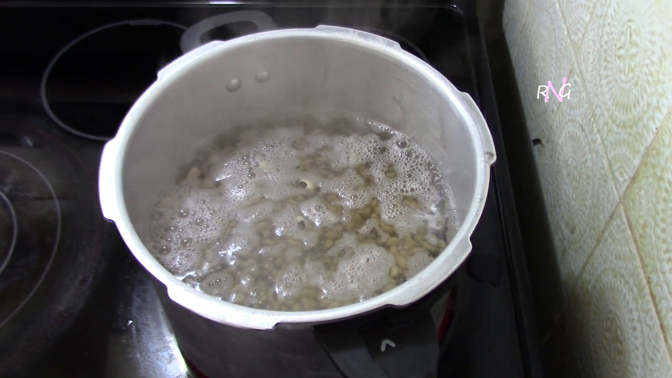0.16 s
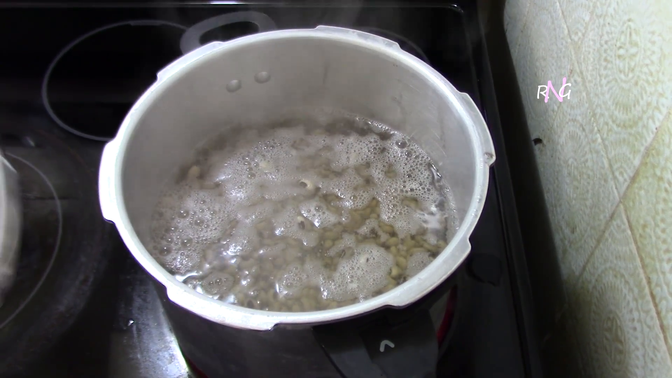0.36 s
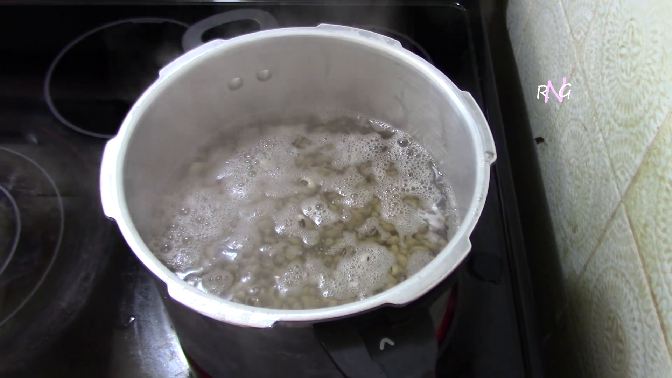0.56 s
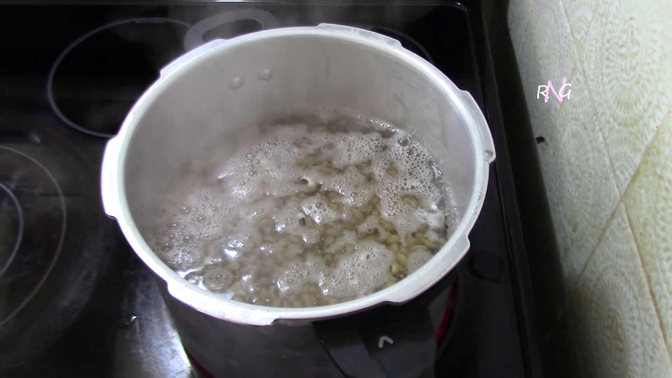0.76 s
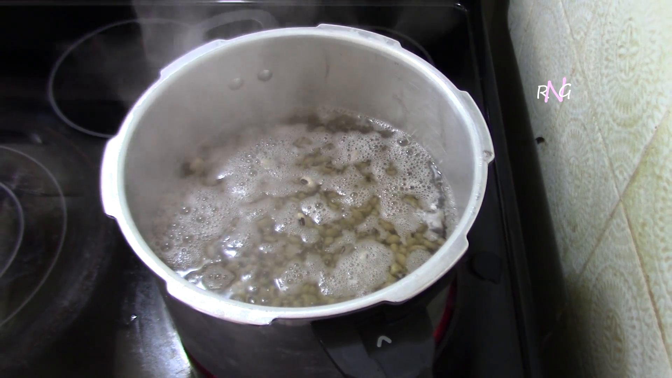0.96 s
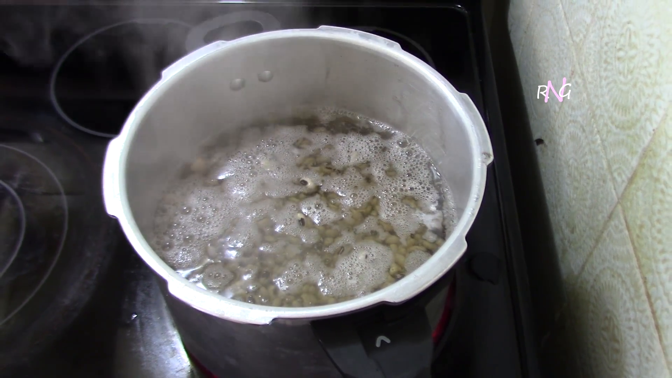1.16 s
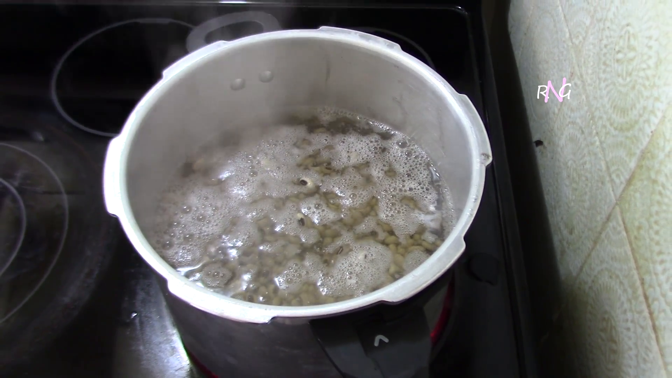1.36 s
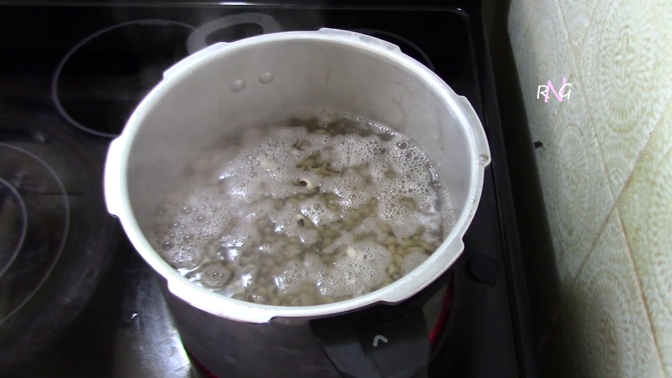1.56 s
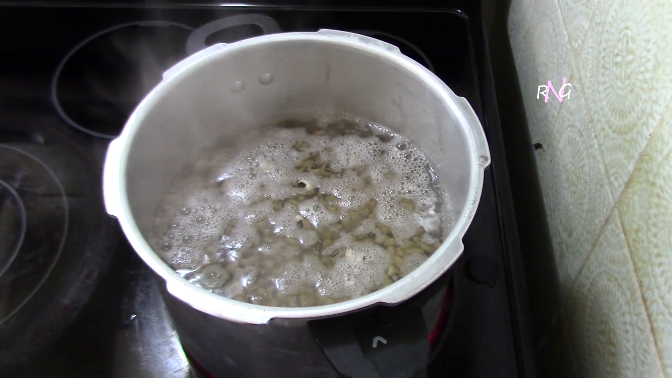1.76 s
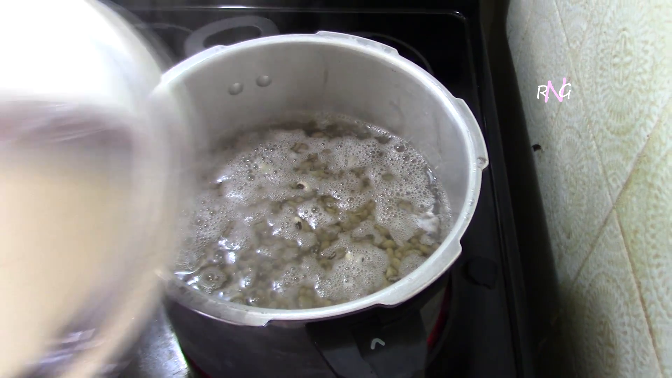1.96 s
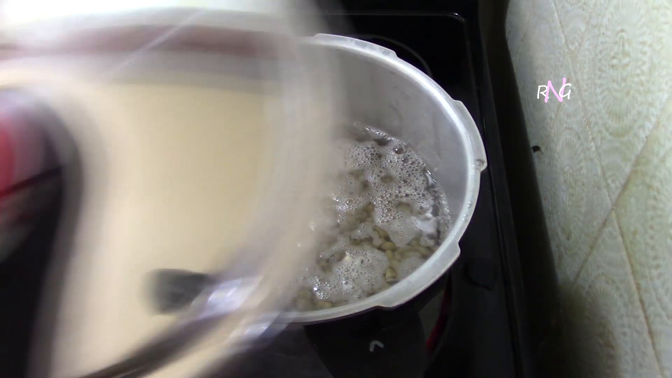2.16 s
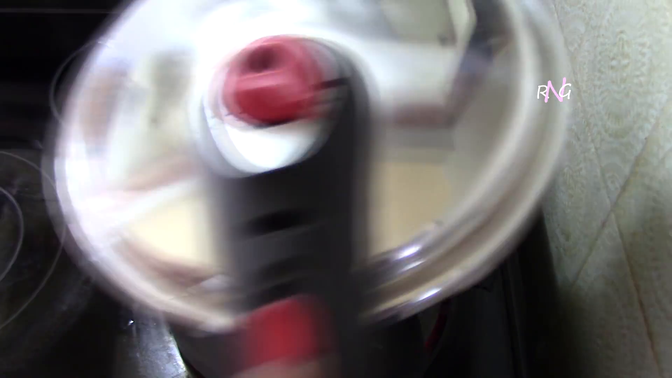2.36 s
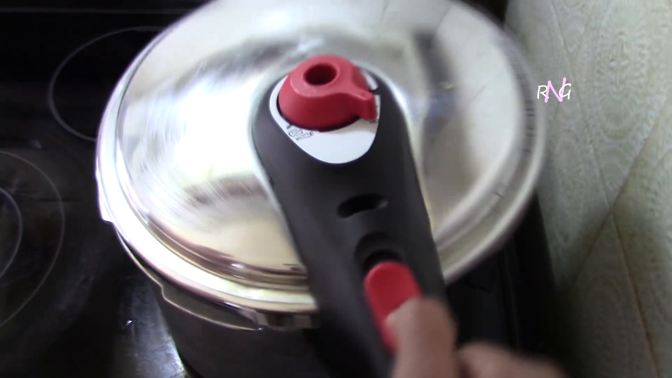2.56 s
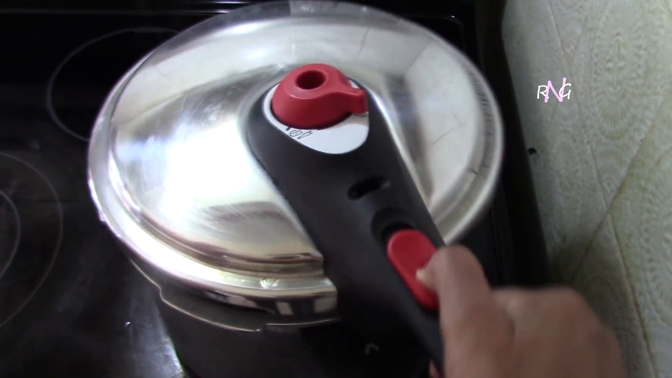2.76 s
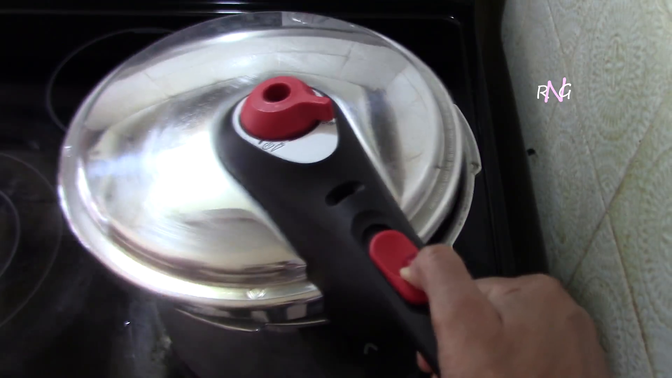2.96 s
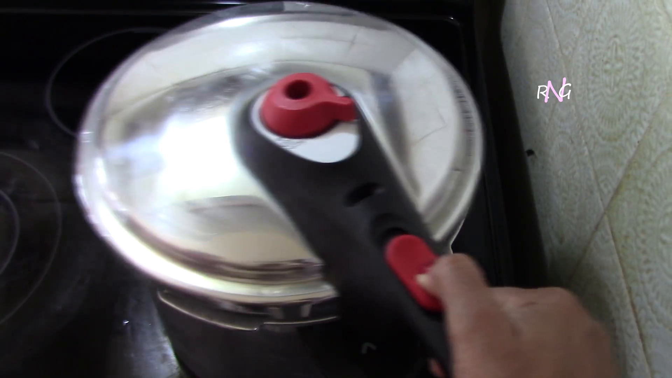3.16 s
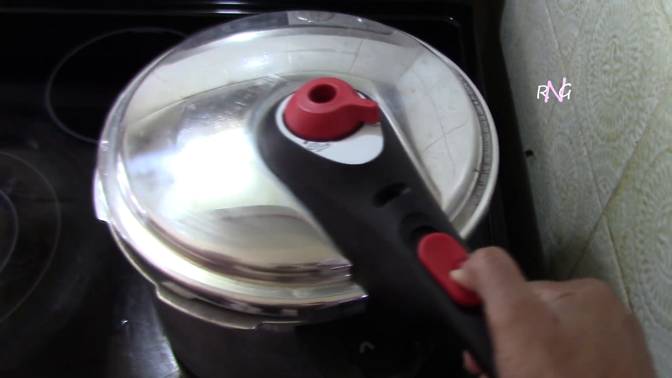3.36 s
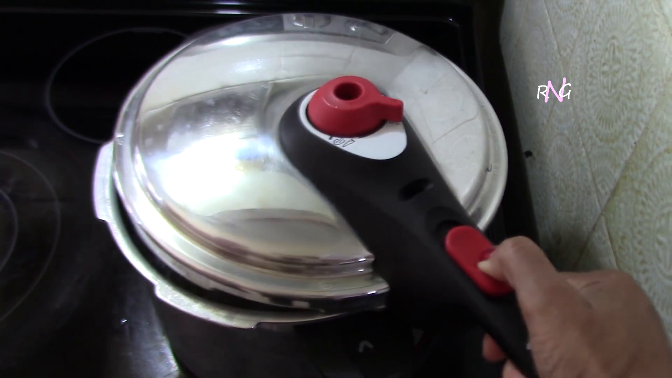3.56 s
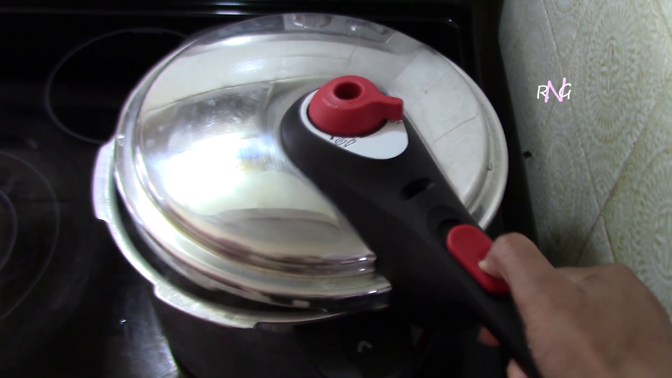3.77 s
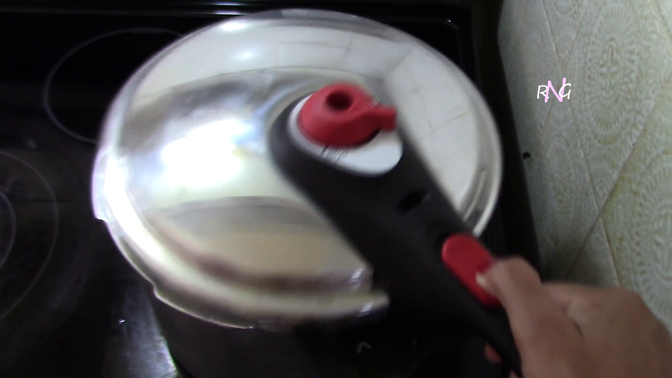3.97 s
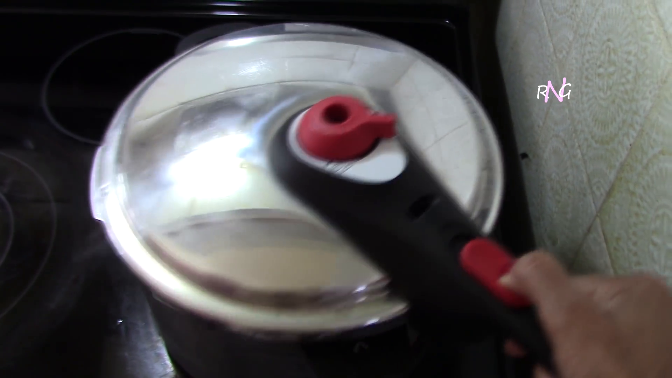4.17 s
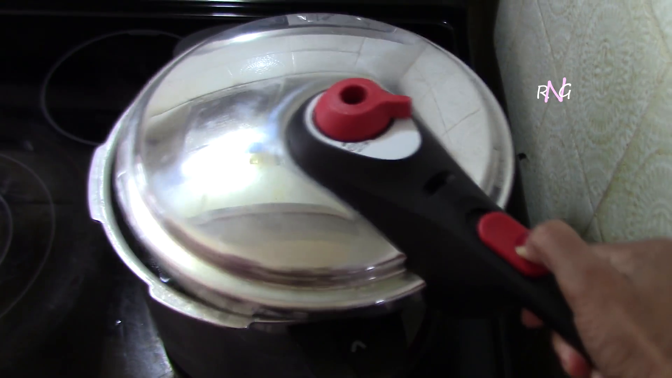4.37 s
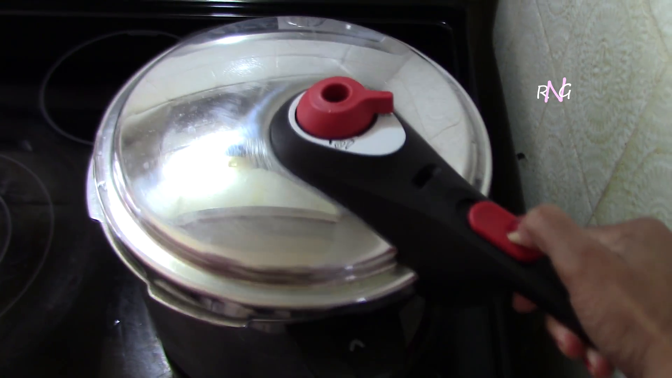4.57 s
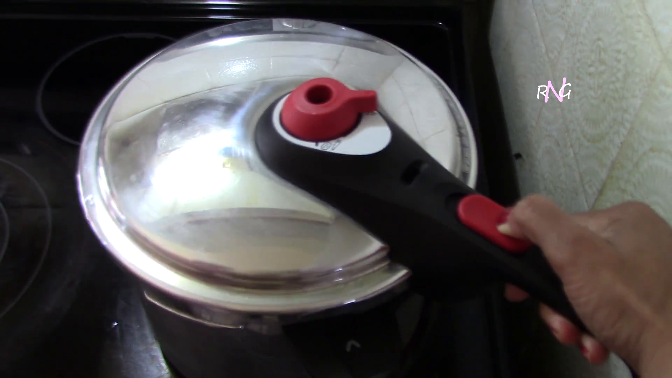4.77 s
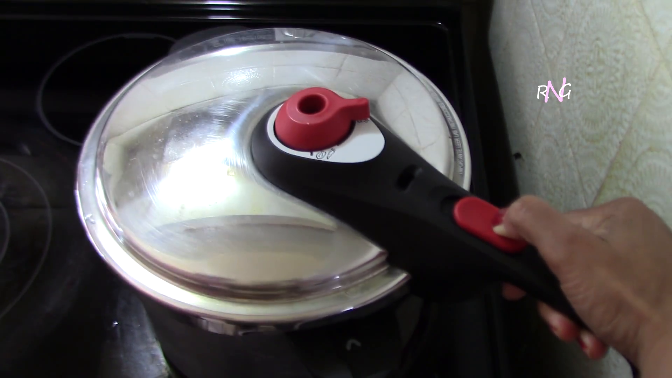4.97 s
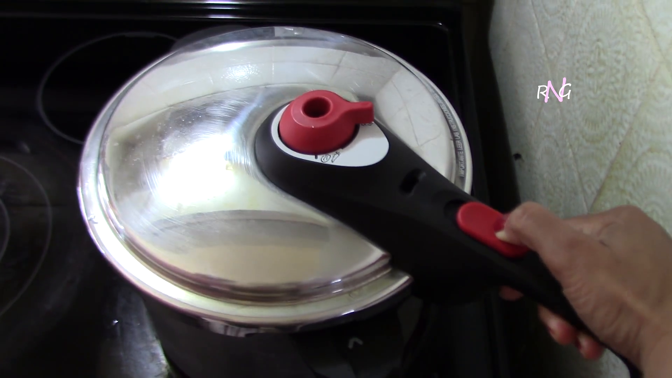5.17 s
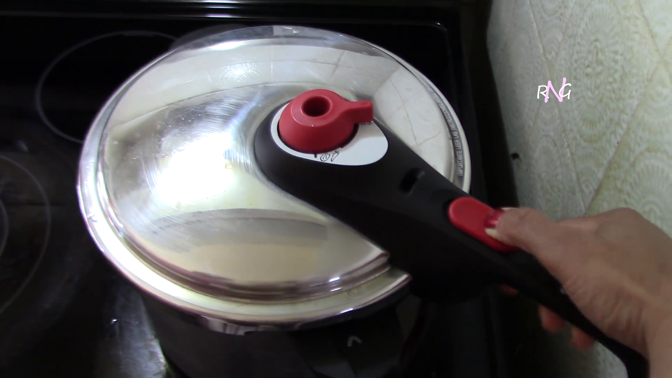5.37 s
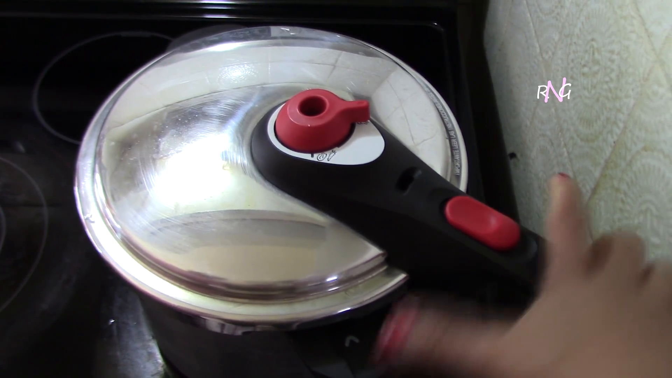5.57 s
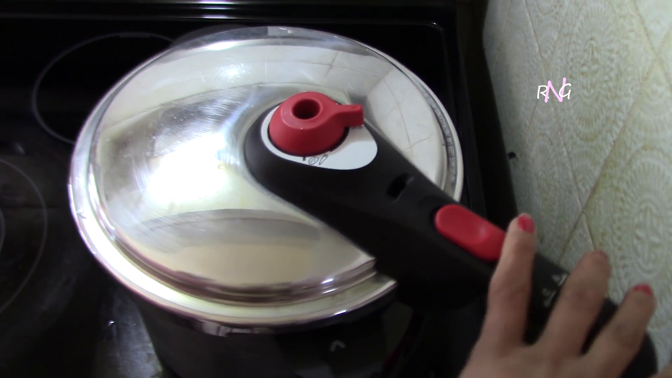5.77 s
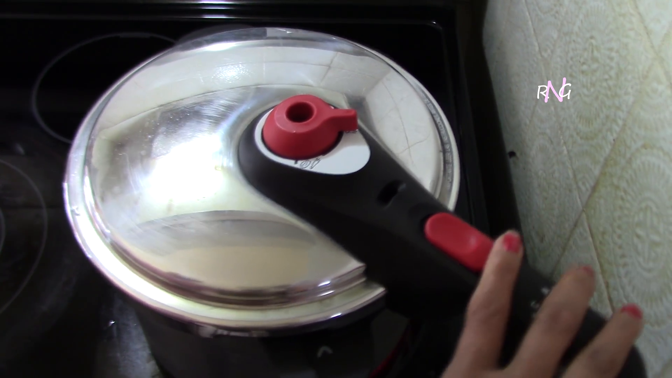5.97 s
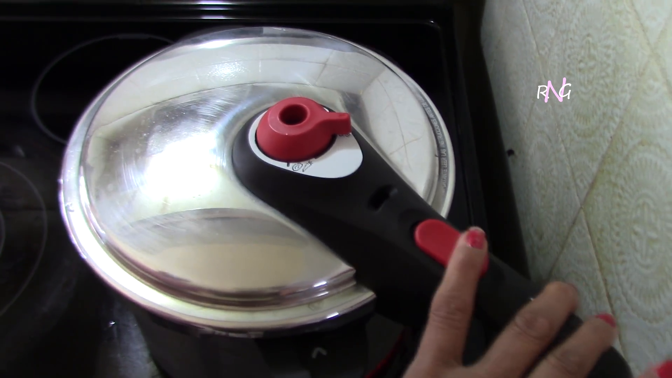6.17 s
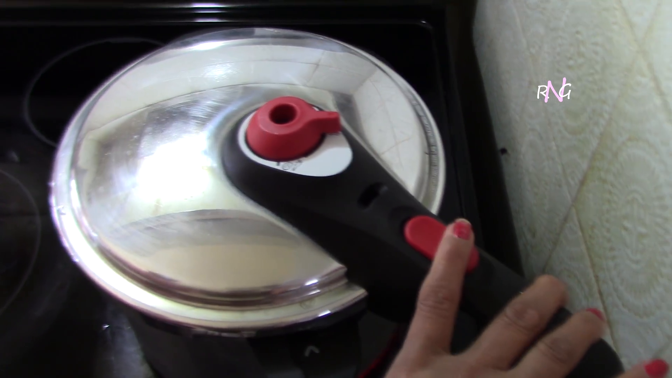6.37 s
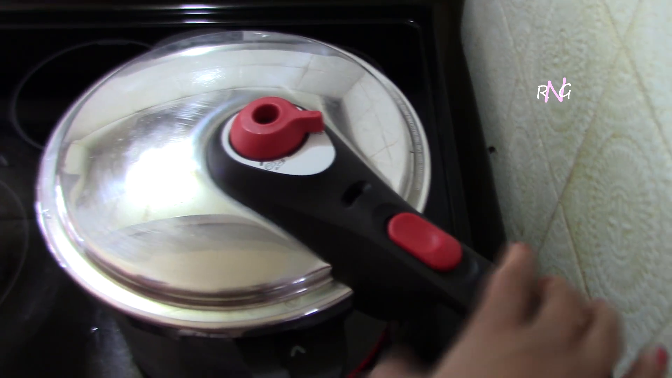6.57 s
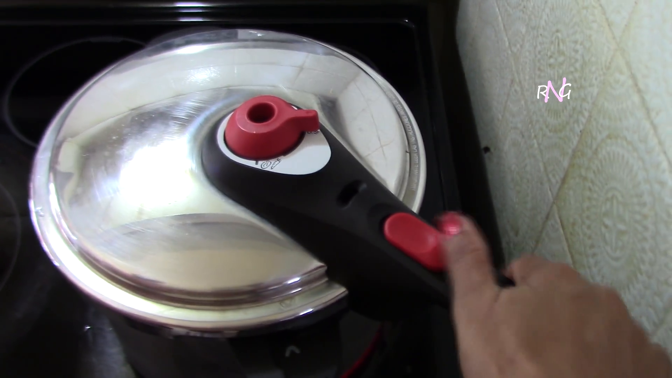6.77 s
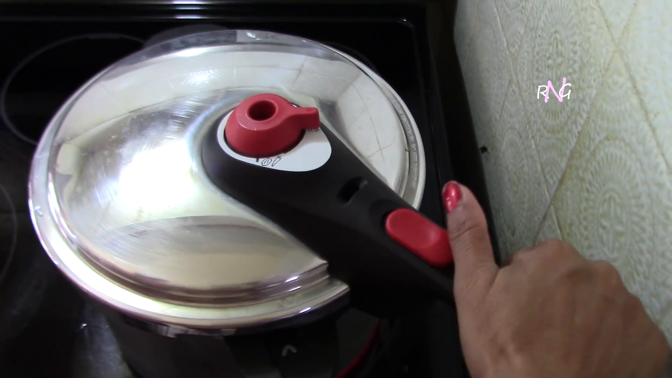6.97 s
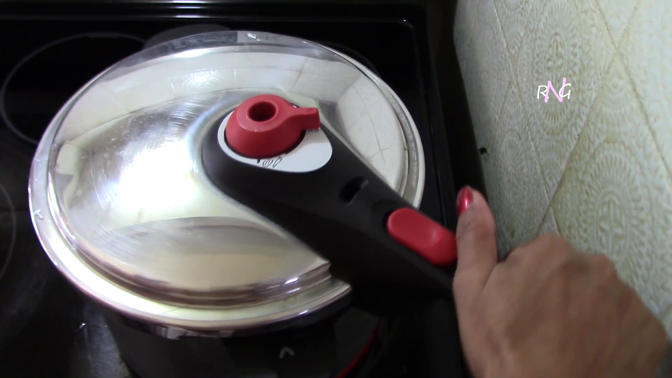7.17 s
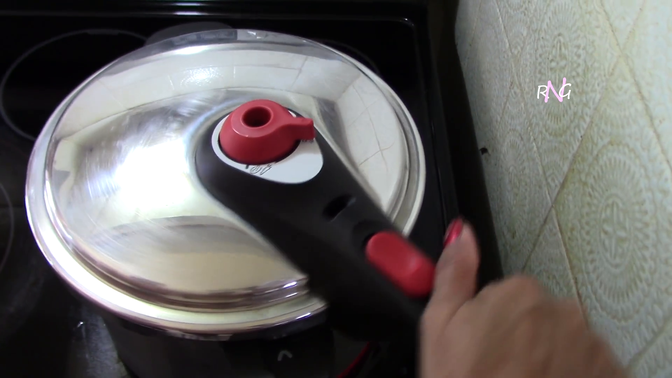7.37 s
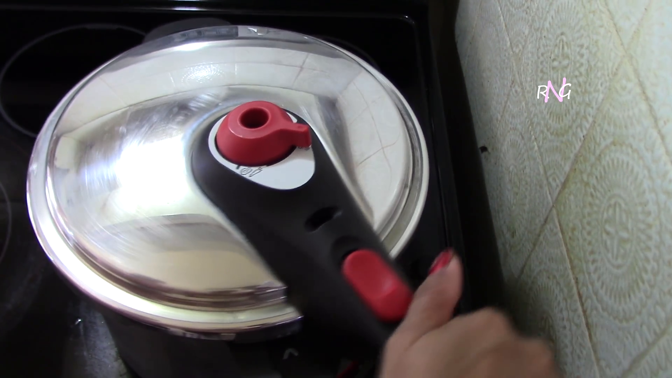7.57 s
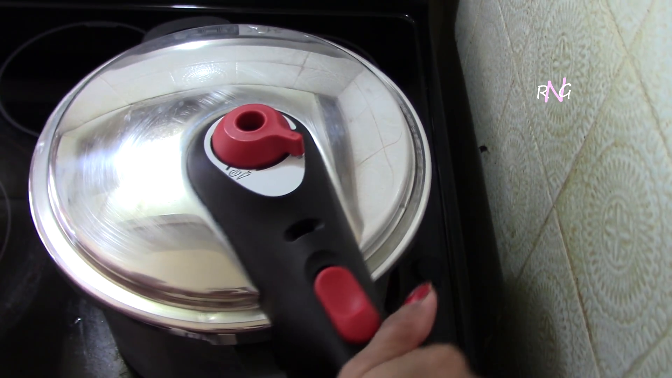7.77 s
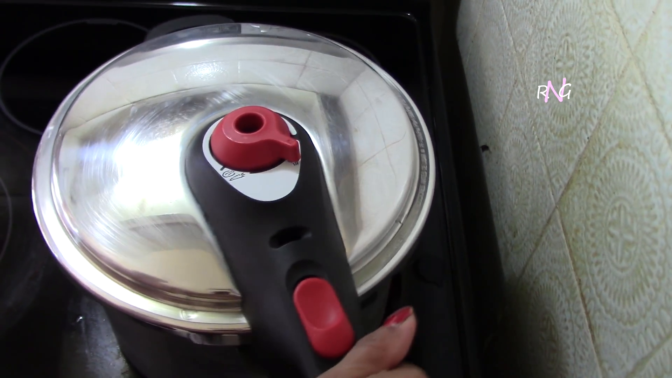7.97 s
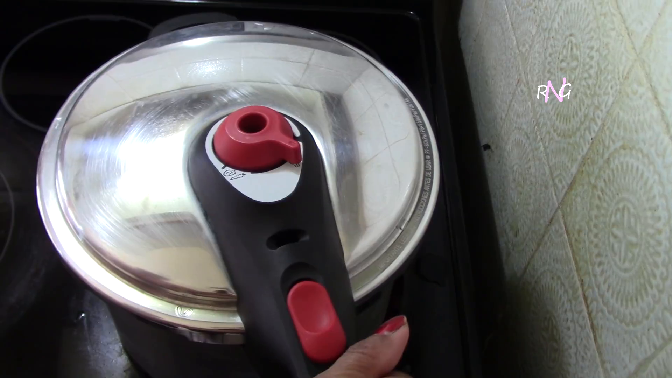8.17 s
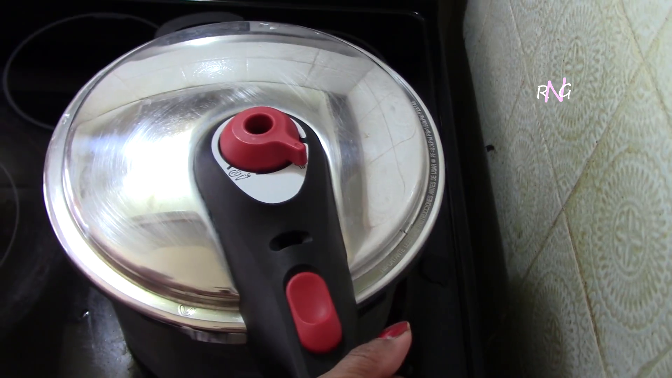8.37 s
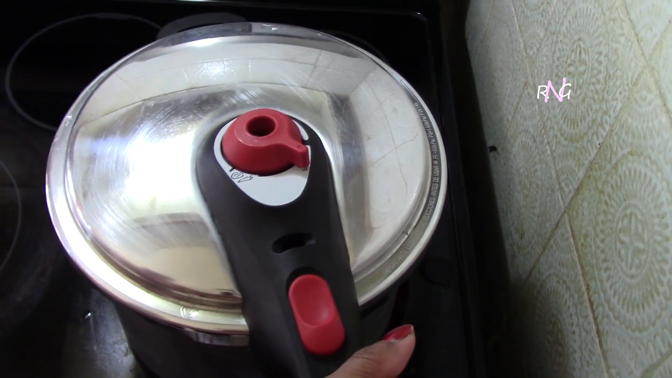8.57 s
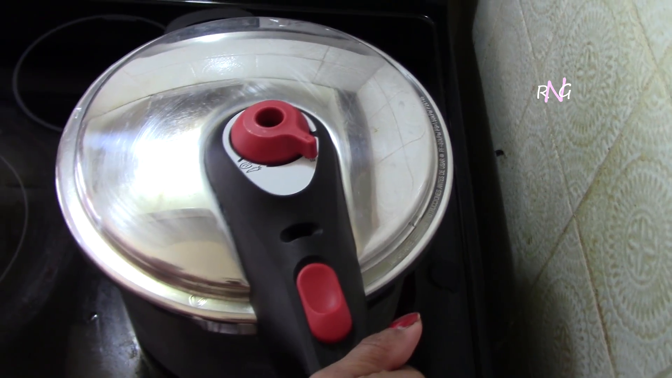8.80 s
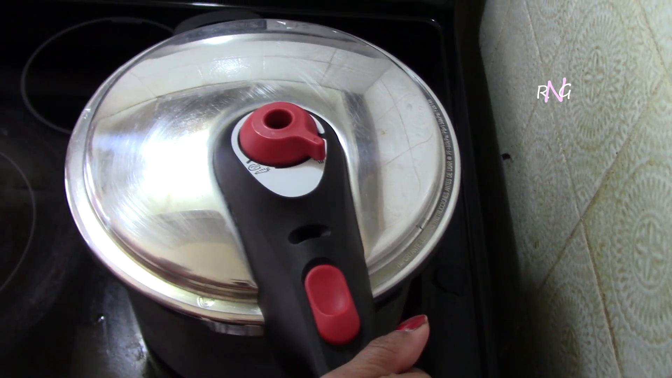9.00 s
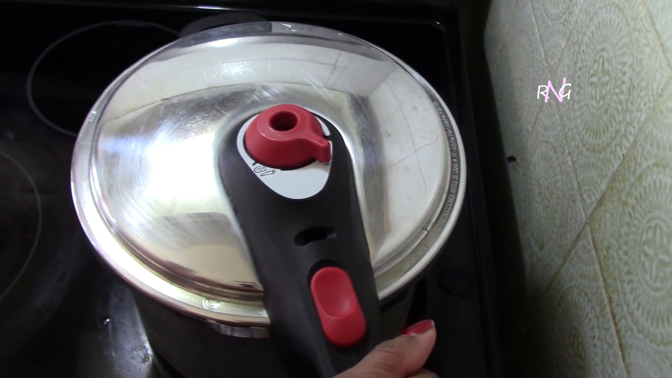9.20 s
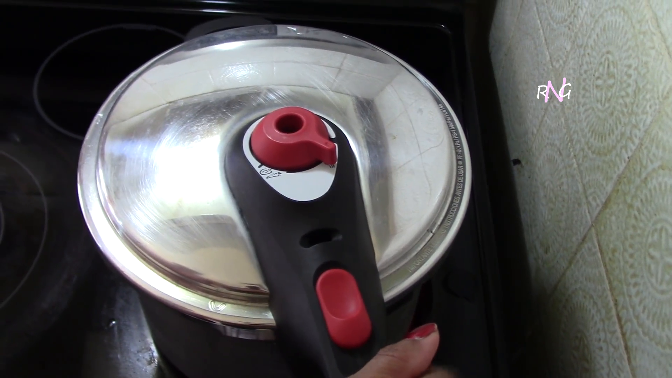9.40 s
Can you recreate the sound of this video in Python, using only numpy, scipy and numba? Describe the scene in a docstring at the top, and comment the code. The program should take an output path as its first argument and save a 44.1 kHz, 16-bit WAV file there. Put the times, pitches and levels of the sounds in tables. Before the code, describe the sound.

Close above a boiling pot in a small kitchen: low frothy bubbling with soft sizzling spurts and faint metal taps. A steel lid then clanks, clatters and scrapes around the rim, booming hollowly, with a rubbery judder. Plastic handle clacks follow, a short squeak, rising thin steam hiss, and a very loud metallic snap as the lock shuts, ringing briefly before the boil continues.

```python
"""Small kitchen, microphone close above a pot boiling on a stove: froth, bubbles and spurts of sizzle throughout the start.
A steel pressure cooker lid knocks (ringing modes), booms over the pot and scrapes into place on the rim (tiny slips),
and its gasket judders at the pot's hollow note. The plastic handle clacks, steam (coloured noise) starts to hiss at
the seal, and the lid turns with a squeak. The lock snaps shut, shell and room ring, and the whistles in the steam shift.
A steady low hum lies underneath; the microphone's limiter ducks whatever goes over its ceiling."""
import sys
import numpy as np
from scipy import signal
from scipy.fft import rfft, irfft, next_fast_len
from scipy.io import wavfile
from scipy.ndimage import uniform_filter1d
from numba import njit

SR = 44100
rng = np.random.default_rng(int(sys.argv[2]) if len(sys.argv) > 2 else 0)


def put_to_file(sound):
    """Save the sound as 16-bit audio at rate SR, in the file named by the first command-line argument."""
    columns = np.atleast_2d(sound).T  # one column per channel
    safe = np.clip(columns, -1, 1)
    whole_steps = np.round(safe * 32767)
    wavfile.write(sys.argv[1], SR, whole_steps.astype(np.int16))


N = 416304
TIME = np.arange(N) / SR  # the whole scene, s
AGE = np.arange(int(.8 * SR)) / SR  # time since a blow, s


# Steel lid knocking on the pot, close below the microphone:
# start_s, strength_db, weight_db (added to the thud), hardness_db (added per band above the ring)
LID_KNOCKS = [(0.612,-37,-4,-9),(.637,-33,-8,-4.5),(1.163,-34.5,-3,-7.5),(1.68,-57.5,0,15.5),(1.706,-37,-12,6.5),(1.802,-40,-4,-2),(1.82,-42.5,2,-2),(2.028,-42.5,-15,-12),(2.24,-28.5,-12,-7),(2.265,-50,11,12),
              (3.024,-21.5,1,-1.5),(3.061,-31.5,-3,0.5),(3.208,-43.5,7,-0.5),(3.41,-11.5,-5,-1),(3.465,-20.5,-4,1),(3.576,-18.5,8,1),(3.606,-33.5,13.5,0),(3.933,-17.5,-1,3),
              (4.005,-12.5,5.5,3),(4.023,-16.5,-24,-10),(4.114,-9.5,-0.5,0),(4.157,-7,-3.5,2.5),(4.175,-22,-12,-6),(4.19,-13,-16,-10),(4.204,-17.5,-0.5,3),(4.232,-16,-3.5,-3),(4.262,-10.5,-1.5,-1),(4.287,-12,-8,1),(4.311,-13.5,-4.5,1),
              (4.572,-21,4.5,-4),(4.686,-31.5,5,-2.5),(4.719,-26,8,2),(4.843,-18.5,5,4.5),(4.853,-17,-1,0),(4.866,-33,-2,4),(4.955,-16,3,1.5),(4.971,-16.5,-5,2.5),(4.991,-27.5,-12,6)]
# Ringing modes of the lid on the pot: pitch_hz, level_db, t60_s
LID_MODES = [(159.4, -18.5, 0.41), (188.2, -17, 0.49), (344, -2.5, 0.12), (488, -29, 0.16),
             (675.7, -1.5, 0.11), (1060, 2.5, 0.11), (1133, -1.5, 0.19), (1167, -3.5, 0.33),
             (1283, -6, 0.34), (1312, -2.5, 0.17), (1290, -12.5, 0.32), (1704, -3.5, 0.082),
             (2050, -12, 0.2), (2340, -27, 0.19), (2600, -22, 0.31), (2744, -13.5, 0.25), (3160, -9, 0.076),
             (3480, -3.5, 0.067), (3720, -18.5, 0.35), (4040, -23.5, 0.4), (4400, -45, 0.27)]
# Spectrum of steel on steel: frequency_hz, level_db (per Hz)
LID_COLOUR = [(60, -26), (160, -19), (250, -11.5), (340, 10.5), (440, 4), (670, -2), (800, -5), (1170, 5),
              (1870, -5.5), (3500, -7), (9000, -25.5), (15500, -49)]
# Thud, ring, clink and tick of a plain knock: level_db
KNOCK_BANDS_DB = [-1.6, 0, -6, -17]
# Hollow note of the covered pot, set by how the lid sits: time_s, pitch_hz
HOLLOW_NOTE = [(3.02,400),(3.41,396),(3.58,352.5),(4.3,355),(4.6,346),(4.71,299),(4.76,303),(4.85,310.5),(4.95,364)]
# Boom over the thud; thuds under the full level lose this many extra dB per dB
BOOM_DB, BOOM_FULL_DB, BOOM_FALLOFF = 5, -13, 0.57


def lid():
    """Steel on steel: a crack and the ring of the dome; heavy knocks also make the pot boom."""
    out = np.zeros(N)
    for start_s, strength_db, weight_db, hardness_db in LID_KNOCKS:
        blow = strike(LID_COLOUR, contact_db=3.5, crack_t60=0.068, tail_db=-12.5, tail_t60=0.41)
        dome = undb(-8.5) * ring(LID_MODES, scatter_db=2.0, detune=.003)
        dome = dome + undb(-7) * overtones(LID_COLOUR, t60=0.16, count=45)
        knock = voice(blow + dome, KNOCK_BANDS_DB, weight_db, hardness_db, snap=0.2, snap_t60=0.079)
        add(out, start_s, undb(strength_db) * knock)

        thud_db = strength_db + weight_db
        boom_db = thud_db + BOOM_DB - BOOM_FALLOFF * max(BOOM_FULL_DB - thud_db, 0)
        hollow_hz = np.interp(start_s, *np.transpose(HOLLOW_NOTE))
        add(out, start_s, undb(boom_db) * boom(hollow_hz))
    return out


# Rim sliding on the rim: peak_s (hardest push), rise_s, fall_s (20 dB each), level_db
SLIDES = [(3.9,0.1,0.072,-41.5),(4.18,0.09,.1,-18),(4.27,0.13,0.059,-19),(4.49,.09,0.14,-29.5),(4.729,.07,0.042,-22.5),(4.92,0.21,0.17,-33)]
# Rubber gasket juddering: peak_s (hardest push), rise_s, fall_s (20 dB each), level_db
JUDDERS = [(4.599,0.018,0.071,-32),(4.66,.05,.12,-25.5),(4.738,.06,.035,-22),(4.81,0.025,0.015,-29)]


def scrape():
    """Tiny slips of the rim shake the lid; the gasket judders at the pot's hollow note."""
    slips = crackle(rate=670, spread_db=2.0)
    lid_ring = ring(LID_MODES, scatter_db=2.0, detune=0.0045)
    body = unit(signal.fftconvolve(slips, lid_ring)[:N])
    grit = colour(slips + 0.17 * rng.standard_normal(N), LID_COLOUR)
    slide = undb(-7) * body + undb(-2.5) * grit

    hollow_hz = np.interp(TIME, *np.transpose(HOLLOW_NOTE))
    unsteady_hz = hollow_hz * (1 + 0.0244 * walk(90))
    phase = 2 * np.pi * np.cumsum(unsteady_hz) / SR
    judder = unit(np.sin(phase) * undb(4.1 * walk(87)))
    slide_gain = sum(surge(*row) for row in SLIDES)
    judder_gain = sum(surge(*row) for row in JUDDERS)
    return slide_gain * slide + judder_gain * judder


# Plastic handle and its slider: start_s, strength_db, weight_db (added to the thud),
# hardness_db (added per band above the ring)
HANDLE_CLACKS = [(3.786,-48.5,2,7.5),(5.288,-50,-3,5.5),(5.363,-46,2,4),(5.381,-36.5,-1,5.5),(5.4,-37,-2.5,-16),(5.447,-30,-16,4),(5.907,-58,-2,7.5),(6.174,-39.5,-2,-2),(6.233,-19,-2,0),(6.25,-26,3,4.5),
                 (6.502,-38,-8,-7),(6.537,-44.5,-1,4.5),(7.133,-31.5,3,-3.5),(7.155,-37.5,3,-2.5),(7.365,-36,3.5,-1),(7.39,-48,12.5,-6),(7.398,-25,-6,-4.5),(7.432,-28.5,-2,0.5),(7.461,-27.5,4.5,-11),(7.474,-34.5,3,-0.5),(8.204,-36.5,-13,3),(9.34,-58.5,5,12)]
# Ringing modes of the handle: pitch_hz, level_db, t60_s
HANDLE_MODES = [(194, -7.5, 0.43), (232, -14.5, 0.39), (689, 5, 0.18), (1300, -3, 0.07), (1800, 4, 0.088),
                (2340, -19, 0.11), (3330, -25, 0.18)]
# Spectrum of a clack: frequency_hz, level_db (per Hz)
HANDLE_COLOUR = [(60, -17), (226, -6), (600, -8.5), (1290, 5.5), (1850, -5.5), (2200, -12), (2700, -8),
                 (3700, -9), (4700, -15), (9000, -25), (15500, -52)]
# Thud, ring, clink and tick of a plain clack: level_db
CLACK_BANDS_DB = [3, 3, -4, -12]
# Hand bearing down on the handle: start_s, level_db, pitch_hz
PRESSES = [(6.241, -17.5, 231), (6.502, -26, 180)]


def handle():
    """Short dry clacks of plastic, and low booms where the hand bears down."""
    out = np.zeros(N)
    for start_s, strength_db, weight_db, hardness_db in HANDLE_CLACKS:
        blow = strike(HANDLE_COLOUR, contact_db=1, crack_t60=0.088, tail_db=-14.5, tail_t60=0.41)
        blow = blow + undb(-22.5) * ring(HANDLE_MODES, scatter_db=0.0, detune=0.0143)
        clack = voice(blow, CLACK_BANDS_DB, weight_db, hardness_db, snap=0.25, snap_t60=0.054)
        add(out, start_s, undb(strength_db) * clack)
    for start_s, level_db, pitch_hz in PRESSES:
        add(out, start_s, undb(level_db) * boom(pitch_hz))
    return out


# Bolt sliding, then hitting home: start_s, level_db
LOCK_HITS = [(8.3297, -20.5), (8.3361, 8.5)]
# Clamped shell when the bolt hits it: pitch_hz, level_db, t60_s
SHELL_MODES = [(1023, -22, 0.26), (1097, -14.5, 0.33), (1165, -14, 0.45), (1590, -19, 0.29),
               (1683, -8, 0.28), (2030, -29, .3), (2230, -17, 0.31), (2922, -17, 0.33), (3630, -14, 0.4),
               (3480, -15, 0.3), (4030, -22, 0.35), (4580, -13, 0.29), (5400, -21, .3), (6300, -27, 0.3),
               (8350, -23, 0.3)]
# Spectrum of the bolt's blow: frequency_hz, level_db (per Hz)
LOCK_COLOUR = [(80, -19.5), (230, -14.5), (400, -20.5), (800, -12.5), (1150, -3), (1650, -1.5),
               (2000, -9.5), (2900, -8), (3900, -0.5), (5500, -10), (8500, -15.5), (12000, -27),
               (15500, -34)]


def lock():
    """The spring bolt shoots home, far louder than the rest, and sets shell and room ringing."""
    crack_colour = [(300, -48), (1200, 12.0), (4000, 2), (8700, 6), (12000, -6), (15500, -10)]
    out = np.zeros(N)
    for start_s, level_db in LOCK_HITS:
        blow = strike(LOCK_COLOUR, contact_db=0, crack_t60=0.054, tail_db=-10.5, tail_t60=0.35)
        shell = undb(-11) * ring(SHELL_MODES, scatter_db=1.2, detune=.001)
        shell = shell + undb(-15) * overtones(LOCK_COLOUR, t60=0.38, count=40)
        crack = colour(rng.standard_normal(len(AGE)), crack_colour) * fade(0.04)
        add(out, start_s, undb(level_db) * (blow + shell + undb(3.0) * crack))
    return out


# Skin and plastic brushing, brief squeaks: start_s, length_s, pitch_hz, width_hz, level_db
RUBS = [(.2,0.11,2600,250,-50),(6.213,.012,1890,120,-37),(6.728,.036,12000,4500,-44.5),(6.73,0.035,7500,3000,-48),(6.854,0.11,7950,7000,-51),(7.46,0.1,5430,600,-44.5),(7.465,0.11,4500,450,-49),(7.47,.07,9900,9000,-50.5),(7.588,0.45,1510,895,-50),(7.748,0.3,3340,700,-58)]
# Seal squeaking as the lid starts to turn: start_s, length_s, level_db (added to every partial)
SQUEAK = (7.05, 0.27, -1.5)
# Partials of that squeak: pitch_hz, level_db
SQUEAK_PARTIALS = [(1790,-52),(2020,-55),(2500,-48.5),(3200,-45.5),(4450,-51.5),(5470,-58)]
SQUEAK_SAG = .035  # share of its pitch lost over the stroke


def squeals():
    """Rubs flutter in a resonance and die away; the seal's squeak stutters and sags in pitch."""
    out = np.zeros(N)
    for start_s, length_s, pitch_hz, width_hz, level_db in RUBS:
        flutter = undb(level_db + 1.2 * walk(45))
        out += arch(start_s, length_s) * flutter * resonance(pitch_hz, width_hz)

    start_s, length_s, squeak_db = SQUEAK
    progress = np.clip((TIME - start_s) / length_s - .5, -1, 1)
    pitch = 1 - SQUEAK_SAG * progress + 0.00304 * walk(40)
    squeak = np.zeros(N)
    for pitch_hz, level_db in SQUEAK_PARTIALS:
        stutter = undb(level_db + 5.7 * walk(50))
        rough_pitch = pitch + .02 * walk(600)
        squeak += stutter * np.sin(2 * np.pi * pitch_hz * np.cumsum(rough_pitch) / SR)
    return out + undb(squeak_db) * arch(start_s, length_s) * squeak


# Spurts of sizzle at the open pot: peak_s, rise_s, fall_s (20 dB each), level_db
SPURTS = [(0,.02,.05,-46.5),(.26,0.18,0.15,-46.5),(.49,0.046,0.21,-49),(.64,0.081,0.24,-44.5),(1.02,0.052,0.27,-43),(1.16,0.03,0.029,-47),(1.71,0.024,0.16,-47),(1.912,0.02,0.2,-41.5)]
# Spectrum of the sizzle: frequency_hz, level_db (per Hz)
SIZZLE_COLOUR = [(820, -35), (1400, -5), (2250, -2), (2640, 1), (3870, -7), (6660, -5.5), (12200, -15.5),
                 (15500, -25)]
# Flow of steam through the closing seal: time_s, level_db
STEAM = [(6.6,-63),(7.0,-52.5),(7.4,-83),(7.62,-55),(7.9,-46.5),(8.2,-45),(8.75,-50.5),(9.28,-57),(9.44,-49.5)]
# Spectrum of the steam: frequency_hz, level_db (per Hz)
STEAM_COLOUR = [(900, 1), (1700, -2.5), (2100, -6.5), (3400, -2), (4200, -9), (6000, -12), (6700, -5),
                (7400, -9), (8100, -12.5), (9200, -10), (10100, -14), (11000, -11.5), (12200, -18),
                (15500, -18)]
# Whistles of the gaps in the seal, against the flow:
# pitch_hz, width_hz, open_db (before locking), locked_db (after)
WHISTLES = [(7210,450,-9.5,-2),(7940,400,-8.5,-6.5),(8600,1000,-17,-6.5),(10060,900,-18,-10),(11950,1800,-18,-8)]
WHISTLE_DRIFT = .004  # share of their pitch by which the whistles wander


def hiss():
    """Crackly spurts of sizzle at the open pot, then steam whistling past the seal; locking shifts the gaps."""
    sizzle = colour(rng.standard_normal(N) + 3.4 * crackle(rate=890, spread_db=1.5), SIZZLE_COLOUR)
    steam = colour(rng.standard_normal(N) + crackle(rate=500, spread_db=6.0), STEAM_COLOUR)
    steam = steam * undb(0.51 * walk(21))
    locked = TIME > LOCK_HITS[-1][0]
    for pitch_hz, width_hz, open_db, locked_db in WHISTLES:
        wander = 2 * np.pi * pitch_hz * WHISTLE_DRIFT * np.cumsum(walk(6)) / SR
        # turning the phase of the analytic signal shifts the pitch of the noise
        whistle = np.real(signal.hilbert(resonance(pitch_hz, width_hz)) * np.exp(1j * wander))
        level_db = np.where(locked, locked_db, open_db) + 1.8 * walk(9.1)
        steam = steam + undb(level_db) * whistle
    return sum(surge(*row) for row in SPURTS) * sizzle + swell(STEAM) * steam


# Boiling in the pot: time_s, level_db
BOIL = [(0,-42),(2.5,-41.5),(3.4,-41.5),(4.6,-39.5),(5.3,-41.5),(7.0,-40.5),(7.7,-38),(8.3,-41.5),(9.44,-40)]
# Spectrum of the froth: frequency_hz, level_db (per Hz)
BOIL_COLOUR = [(25, -32), (60, -10.5), (95, -9.5), (125, -5.5), (160, -8), (228, 3.5), (262, -6), (300, 1),
               (380, -2.5), (520, -1.5), (741, -6.5), (1200, -9), (1490, -18.5), (3000, -22.5), (8000, -28),
               (15500, -37.5)]
# The open pot's wall sings with the boil until the lid covers it, then falls 20 dB per COVER_FALL_S
POT_HZ, POT_WIDTH_HZ, OPEN_POT_DB = 1195, 20, -55.5
COVERED_S, COVER_FALL_S = 2.08, .4


def boil():
    """A wash of froth with single bubbles, each rising in pitch as it surfaces, and the singing wall."""
    bubbles = np.zeros(N)
    for when, pitch, size in rng.random((1500, 3)):
        hz = 210 * 5 ** pitch
        age = np.arange(int(24 * SR / hz)) / SR  # 24 cycles of the starting pitch
        life = age / age[-1]
        shape = np.exp(-5 * life) - np.exp(-40 * life)
        tone = np.sin(2 * np.pi * hz * age * (1 + 0.06 * life))
        add(bubbles, when * TIME[-1], undb(20.7 * size ** 3 - 7 * pitch) * shape * tone)

    froth = colour(rng.standard_normal(N) + 5.3 * crackle(rate=400, spread_db=1.5), BOIL_COLOUR)
    froth = froth * undb(0.47 * walk(23))
    wall_db = OPEN_POT_DB - 20 * np.maximum(TIME - COVERED_S, 0) / COVER_FALL_S
    wall = undb(wall_db) * resonance(POT_HZ, POT_WIDTH_HZ)
    return swell(BOIL) * (undb(-2.21) * froth + undb(-9) * unit(bubbles)) + wall


def hum():
    """A faint steady low tone: one sine."""
    return undb(-57) * unit(np.sin(2 * np.pi * 119.5 * TIME))


def strike(spectrum, contact_db, crack_t60, tail_db, tail_t60):
    """The instant of contact, the dense short modes of the blow, then the kitchen's reverberation building up."""
    contact, crack, tail = (colour(rng.standard_normal(len(AGE)), spectrum) for _ in range(3))
    room = undb(tail_db) * tail * fade(tail_t60) * (1 - fade(0.11))
    return undb(contact_db) * contact * fade(0.021) + crack * fade(crack_t60) + room


def ring(modes, scatter_db, detune):
    """Decaying modes; each contact point weights and loads them differently."""
    out = 0
    for hz, level_db, t60 in modes:
        weighting, loading, sign = rng.standard_normal(3)
        tone = np.sin(2 * np.pi * hz * (1 + detune * loading) * AGE)
        out = out + np.sign(sign) * undb(level_db + scatter_db * weighting) * fade(t60) * tone
    return out


def overtones(spectrum, t60, count):
    """The many high modes of a steel shell; every contact point wakes a different set."""
    lines = np.zeros(len(AGE) // 2 + 1, complex)
    place, phase = rng.random((count, 2)).T
    hz = 1400 + 9000 * place ** 1.5
    lines[(hz * len(AGE) / SR).astype(int)] = np.exp(2j * np.pi * phase)
    return colour(irfft(lines, len(AGE)), spectrum) * fade(t60)


# Edges of thud, ring, clink and tick: frequency_hz
BAND_EDGES = [90, 700, 2400, 6000, 12300]


def voice(blow, bands_db, weight_db, hardness_db, snap, snap_t60):
    """Weight deepens a blow's thud, hardness lifts its clink and tick; higher bands crowd into the first instant."""
    attack = int(.015 * SR)  # each band is levelled over its first 15 ms
    out = 0
    for k, level_db in enumerate(np.add(bands_db, [weight_db, 0, hardness_db, 2 * hardness_db])):
        band_filter = signal.butter(3, BAND_EDGES[k:k + 2], "band", fs=SR, output="sos")
        band = signal.sosfilt(band_filter, blow) * (1 + snap * k * fade(snap_t60))
        out = out + undb(level_db) * band / np.sqrt(np.mean(band[:attack] ** 2))
    return out


def boom(hz):
    """The hollow note of the covered pot, prolonged by the room."""
    note = np.sin(2 * np.pi * hz * AGE) * fade(.18) * (1 - fade(0.0051))
    around_note = signal.butter(2, [0.86 * hz, 1.21 * hz], "band", fs=SR, output="sos")
    echo = unit(signal.sosfilt(around_note, rng.standard_normal(len(AGE))))
    return undb(-3.4) * note + undb(-11.5) * echo * fade(.36)


def resonance(hz, width_hz):
    """Noise in one resonance, its width taken at half amplitude, at rms 1."""
    size = next_fast_len(N, real=True)
    bins = np.arange(size // 2 + 1) * SR / size
    response = 1 / (1 + ((bins - hz) / width_hz * 2) ** 2)
    return unit(irfft(rfft(rng.standard_normal(size)) * response, size)[:N])


def crackle(rate, spread_db):
    """Random tiny impulses of uneven size, at a mean rate per second."""
    size = undb(spread_db * np.minimum(rng.exponential(size=N), 5))
    return (rng.random(N) < rate / SR) * rng.choice([-1, 1], N) * size


def colour(x, spectrum):
    """Give a signal a spectrum of (Hz, dB) points, at rms 1."""
    hz, db = np.transpose(spectrum)
    bins = np.maximum(np.arange(len(x) // 2 + 1) * SR / len(x), 1)
    gain = undb(np.interp(np.log(bins), np.log(hz), db))
    return unit(irfft(rfft(x) * gain, len(x)))


def walk(rate):
    """Smooth random drift at rms 1, drawing a new value rate times a second."""
    k = int(SR / rate)
    steps = np.repeat(rng.standard_normal(N // k + 1), k)
    return unit(uniform_filter1d(uniform_filter1d(steps, k), k)[:N])


def swell(curve):
    """Gain from rows of (s, dB); silent outside them."""
    time_s, level_db = np.transpose(curve)
    return undb(np.interp(TIME, time_s, level_db, left=-120, right=-120))


def surge(peak_s, rise_s, fall_s, level_db):
    """Gain that grows to a peak and dies away, by 20 dB over the rise and the fall."""
    away = np.maximum((peak_s - TIME) / rise_s, (TIME - peak_s) / fall_s)
    return undb(level_db - 20 * np.minimum(away, 10))


def arch(start_s, length_s):
    """Gain that swells and dies away within a stroke."""
    life = np.clip((TIME - start_s) / length_s, 0, 1)
    return np.sqrt(4 * life * (1 - life))


def fade(t60):
    """Exponential decay by 60 dB in t60 seconds."""
    return np.exp(-np.log(1000) * AGE / t60)


def undb(db):
    """Decibels to gain."""
    return 10 ** (np.asarray(db) / 20)


def unit(x):
    """Scale to rms 1."""
    return x / np.sqrt(np.mean(x ** 2))


def add(track, start_s, sound):
    """Mix a sound in at a time."""
    i = int(start_s * SR)
    track[i:i + len(sound)] += sound[:N - i]


def diffuse(mid):
    """The faint share of the sound scattered by the walls: a short decaying burst of noise as echo."""
    wall_colour = [(40, 0), (130, -6), (300, -3.0), (1000, -3.0), (4000, 1.5), (8000, 1.0), (14000, 3.0)]
    walls = colour(rng.standard_normal(len(AGE)), wall_colour) * fade(0.034)
    return undb(-16.0) * signal.fftconvolve(mid, walls / np.linalg.norm(walls))[:N]


def scene():
    """Everything is straight ahead; only a faint diffuse share differs between left and right."""
    mid = lid() + scrape() + handle() + lock() + squeals() + hiss() + boil() + hum()
    side = diffuse(mid)
    return np.array([mid + side, mid - side])


@njit
def duck(over_db, attack, release):
    """Gain reduction that jumps on an overload and relaxes afterwards."""
    out, held = np.empty(len(over_db)), 0.
    for i in range(len(over_db)):
        held += (over_db[i] - held) * (attack if over_db[i] > held else release)
        out[i] = held
    return out


def record(dry):
    """The microphone's limiter, its bass cut, clipping at full scale and the treble cut."""
    attack_s, release_s, look_ahead_s, ceiling_db = .0004, .035, .0005, -2.0
    low_cut_hz, top_hz = 106, 15500
    peak_db = 20 * np.log10(np.abs(dry).max(axis=0) + 1e-9)
    over_db = np.maximum(peak_db - ceiling_db, 0)
    reduction_db = duck(over_db, 1 / (attack_s * SR), 1 / (release_s * SR))
    limited = dry * undb(-np.roll(reduction_db, -int(look_ahead_s * SR)))
    bass_cut = signal.butter(1, low_cut_hz, "high", fs=SR, output="sos")
    treble_cut = signal.ellip(8, .2, 70, top_hz, fs=SR, output="sos")
    return signal.sosfilt(treble_cut, np.clip(signal.sosfilt(bass_cut, limited), -1, 1))


dry = scene()
out = record(dry)
put_to_file(out)
```